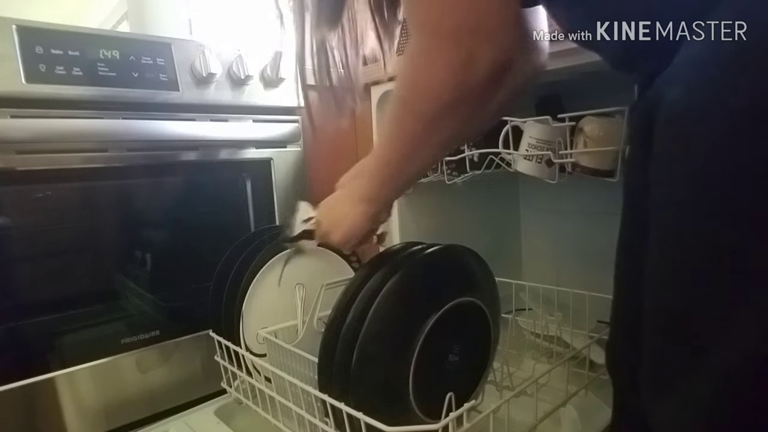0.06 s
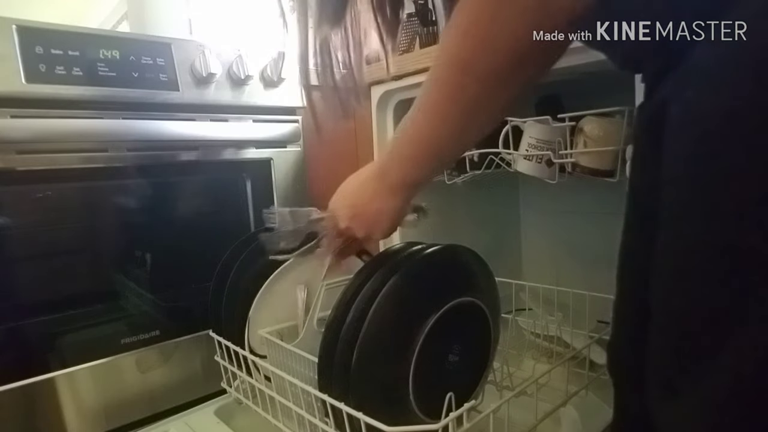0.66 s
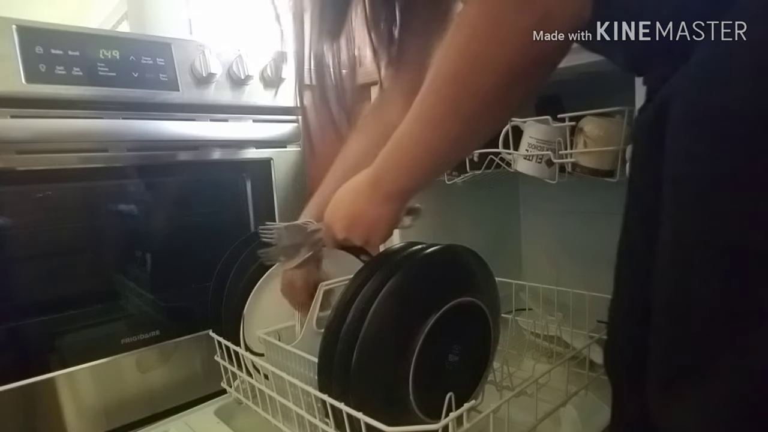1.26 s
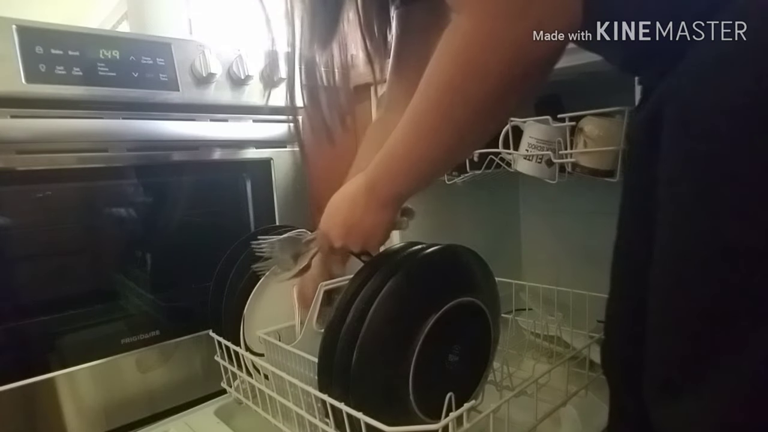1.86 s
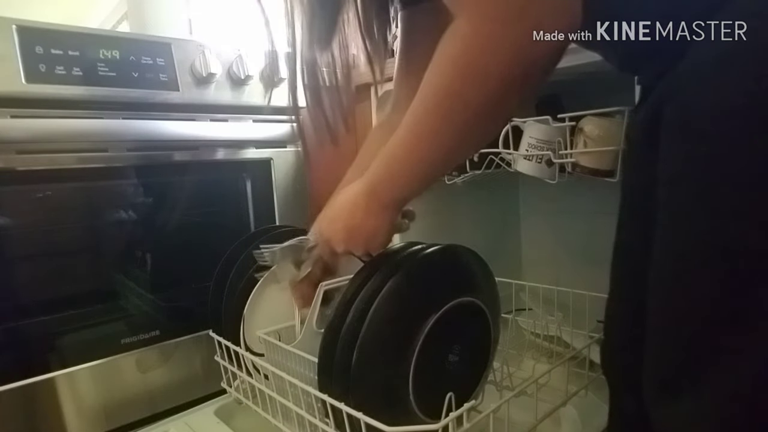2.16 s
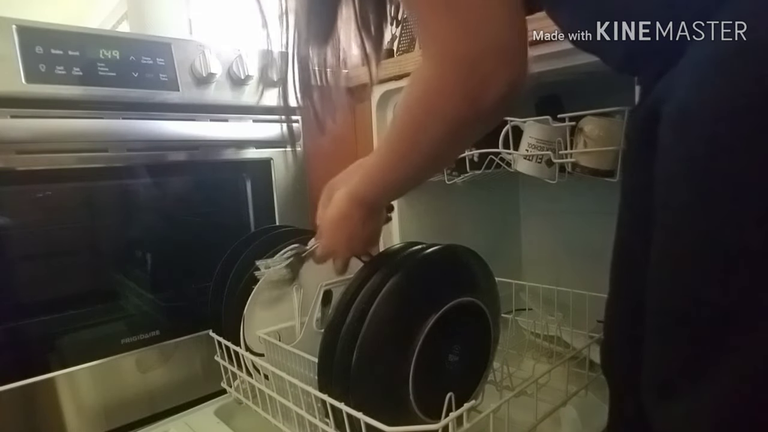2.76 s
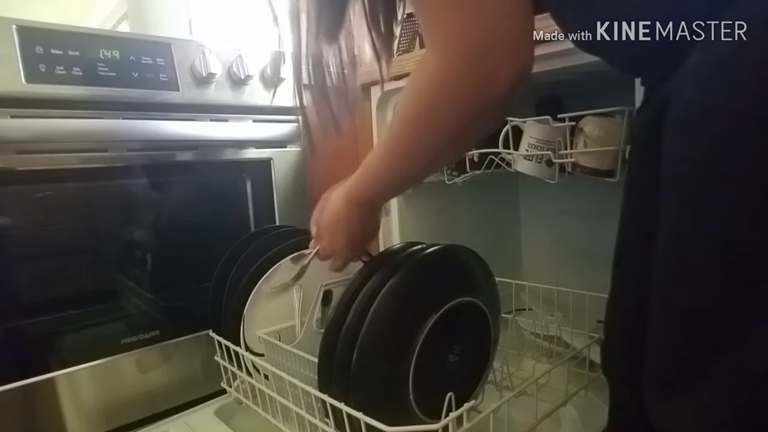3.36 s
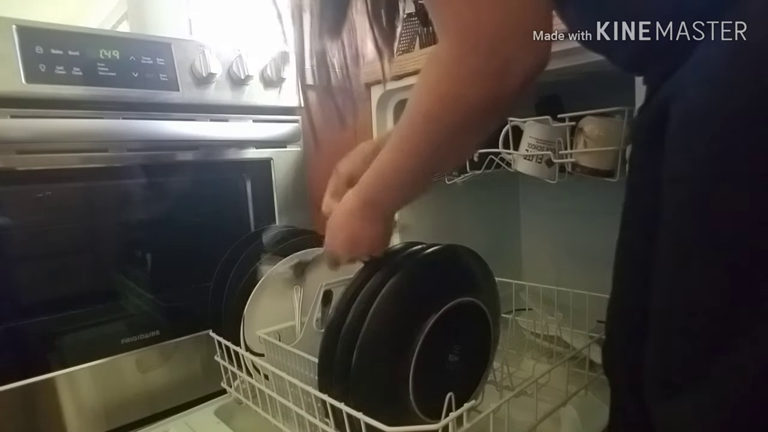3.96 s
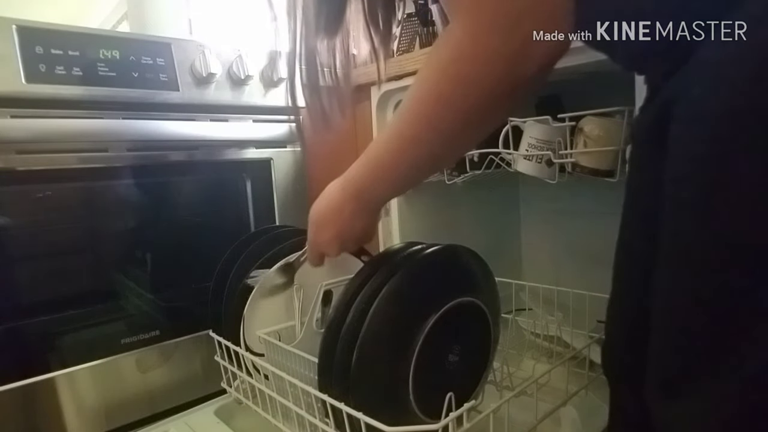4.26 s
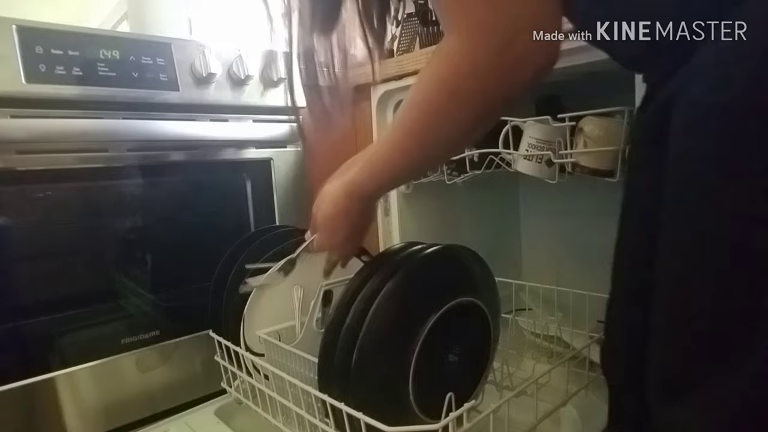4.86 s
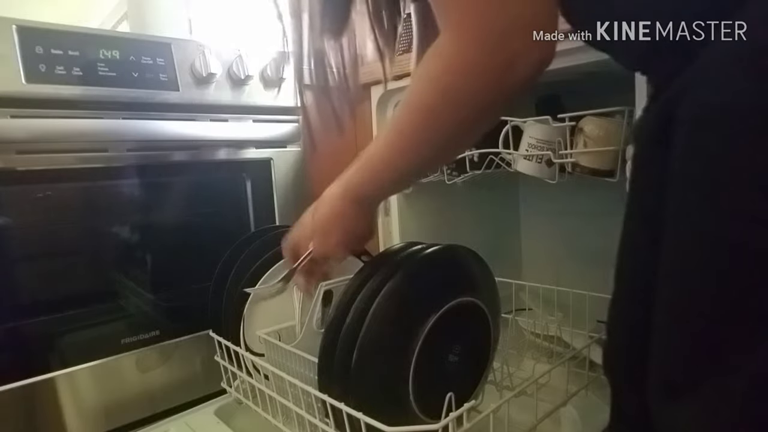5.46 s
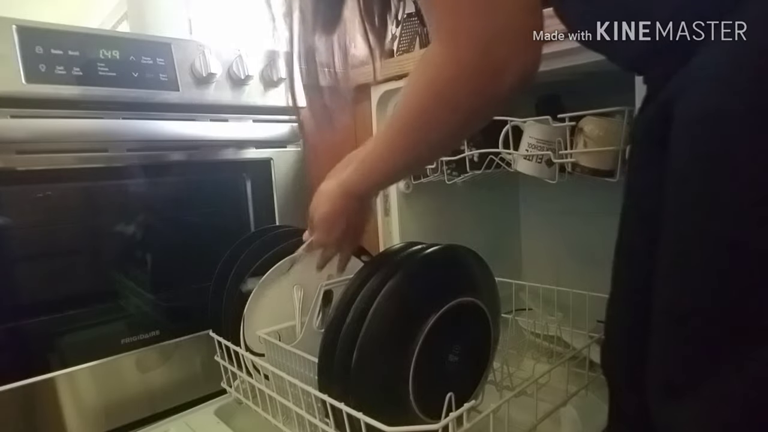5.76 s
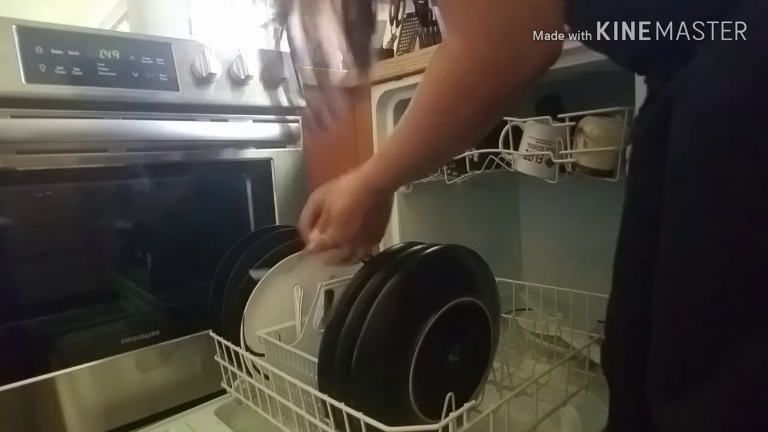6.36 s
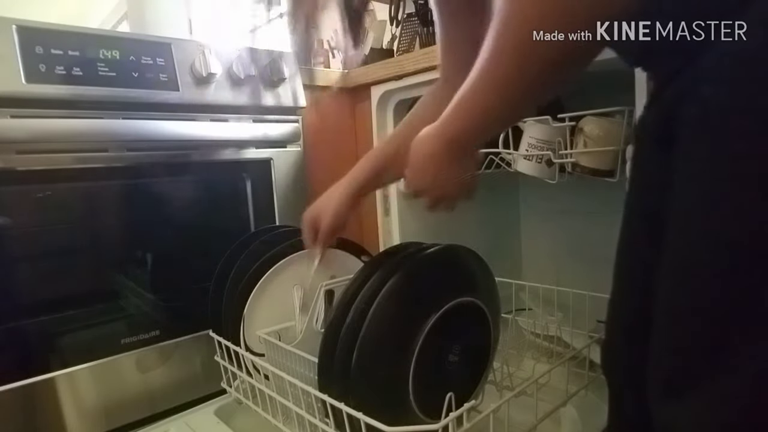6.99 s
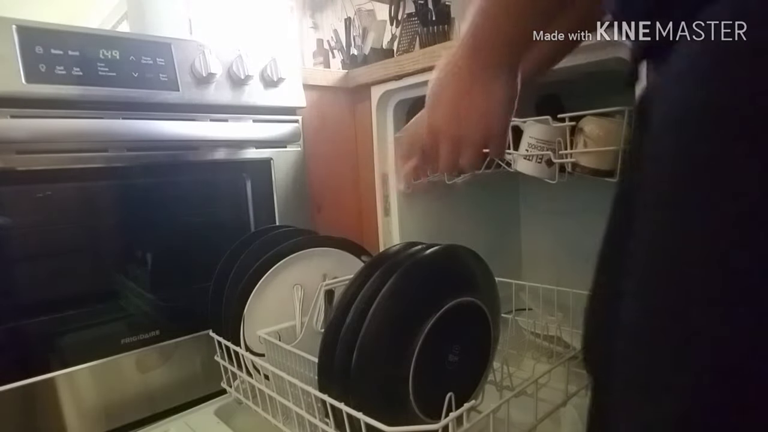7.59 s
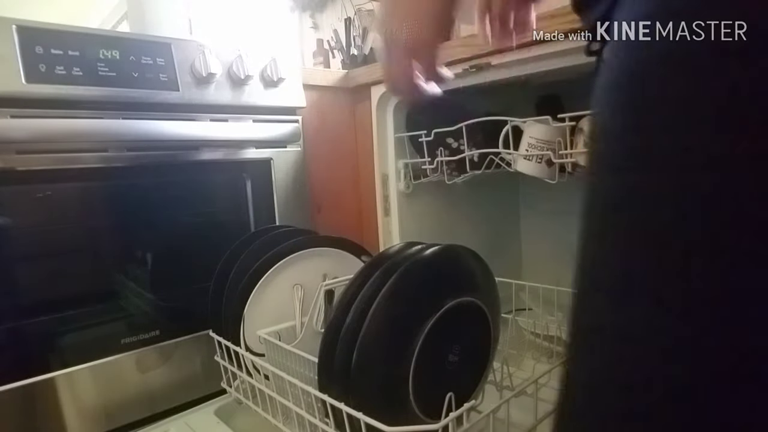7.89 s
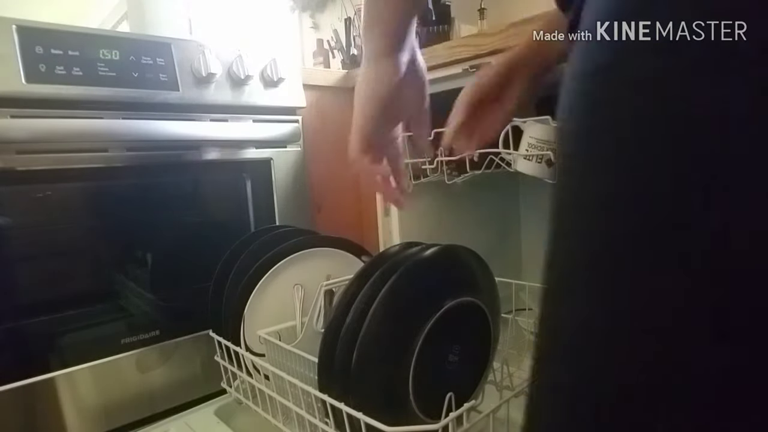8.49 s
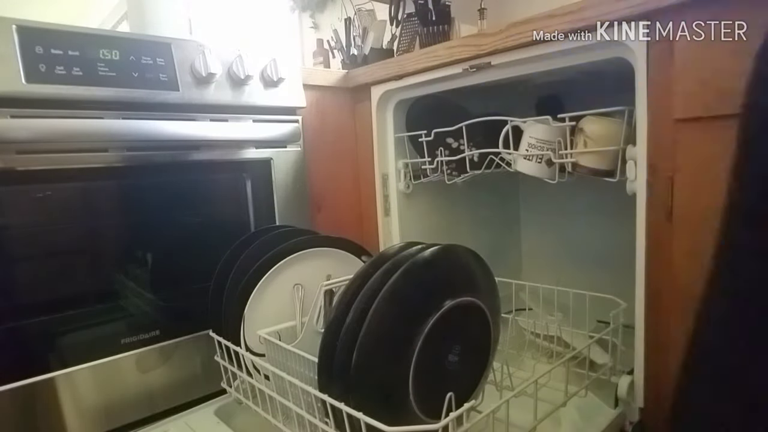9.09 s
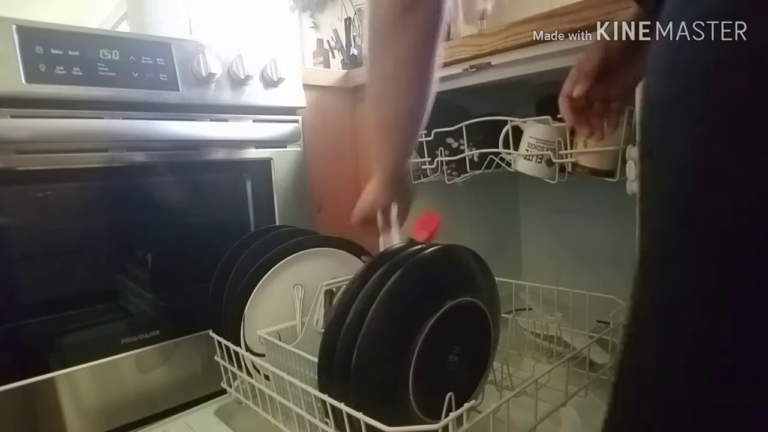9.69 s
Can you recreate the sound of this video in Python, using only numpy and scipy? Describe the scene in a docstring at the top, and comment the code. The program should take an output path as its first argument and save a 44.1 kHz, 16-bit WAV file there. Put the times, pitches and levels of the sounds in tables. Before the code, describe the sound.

Metal forks clink and clatter into a plastic dishwasher basket one by one, followed by a few dry knocks, over a faint hum.

```python
"""Forks go one by one into the plastic cutlery basket of an open dishwasher in a small kitchen.
Each touch is a rapid train of impacts that excites the modes of tines, handle, basket and wire rack.
Near the end clothes rustle and short dry knocks sound, the same parts struck over a low thud.
An appliance hums faintly over a soft hiss throughout, and hard surfaces add a short reverberation."""
import sys
import numpy as np
from scipy import signal
from scipy.fft import rfft, irfft, next_fast_len
from scipy.io import wavfile

SR = 44100
rng = np.random.default_rng(int(sys.argv[2]) if len(sys.argv) > 2 else 0)


def write(x):
    x = np.atleast_2d(x).T
    wavfile.write(sys.argv[1], SR, np.round(np.clip(x, -1, 1) * 32767).astype(np.int16))


N = 429534
RING = int(.35 * SR)  # samples given to one touch


def undb(db):
    """Amplitude ratio of a level in decibels."""
    return 10 ** (np.asarray(db) / 20)


def curve(points, hz):
    """Interpolation on a logarithmic frequency axis."""
    points = np.asarray(points)
    return np.interp(np.log(hz + 1), np.log(points[:, 0]), points[:, 1])


def freqs(size):
    """Fourier bin frequencies for that many samples."""
    return np.fft.rfftfreq(size, 1 / SR)


def response(points, size=2048):
    """Minimum-phase impulse response of a spectrum given as (Hz, dB) points."""
    cepstrum = irfft(np.log(undb(curve(points, freqs(size)))))
    cepstrum[1:size // 2] *= 2
    cepstrum[size // 2 + 1:] = 0
    return irfft(np.exp(rfft(cepstrum)))


def convolve(x, h):
    """Linear filtering of each row, keeping its length."""
    return signal.fftconvolve(np.atleast_2d(x), np.atleast_2d(h), axes=1)[:, :x.shape[-1]]


def unit(x):
    """Normalisation of each row to energy 1."""
    return x / np.sqrt(np.sum(x ** 2, axis=-1, keepdims=True) + 1e-30)


def fade(t60, size=RING):
    """Exponential decay by 60 dB in t60 seconds."""
    return np.exp(-np.log(1000) * np.arange(size) / SR / t60)


# Stereo width. Each row: frequency in Hz, side level relative to mid in dB.
STEREO_WIDTH = [(60, -12.5), (150, -16.5), (300, -12), (600, -7), (1100, -5.5), (4000, -1.5)]

def stereo(pair):
    """Mid-side mixing: two unrelated signals become left and right, coherent mainly in the bass."""
    size = next_fast_len(pair.shape[1] + 2048)
    width = undb(curve(STEREO_WIDTH, freqs(size)))
    mid, side = rfft(pair, size) / np.sqrt(1 + width ** 2)
    return irfft(np.array([mid + width * side, mid - width * side]), size)[:, :pair.shape[1]]


# Spectrum of the hiss. Each row: frequency in Hz, relative spectral density in dB.
HISS_SPECTRUM = [(15, -39), (25, -14), (86, -10.5), (122, 2.5), (144, -12.5), (331, -14.5), (368, -23),
                 (410, -18), (445, -18.5), (782, -24), (1660, -26), (5010, -34.5), (10100, -40.5),
                 (15500, -33)]

def hiss(level_db=-63):
    """Stationary filtered noise makes a soft, even background."""
    noise = convolve(rng.standard_normal((2, N)), response(HISS_SPECTRUM))
    return stereo(unit(noise) * np.sqrt(N)) * undb(level_db)


# Tones of the appliance. Each row: frequency in Hz, RMS level in dB about which it wavers.
HUM_TONES = [(112.5, -81), (61, -75)]

def appliance_hum(waver_db=1.4):
    """Low appliance hum: two faint tones that slowly waver by amplitude modulation."""
    t = np.arange(N) / SR
    waver = np.interp(t, np.linspace(0, N / SR, 40), rng.standard_normal(40))
    hum = sum(np.sqrt(2) * undb(db) * np.sin(2 * np.pi * hz * t) for hz, db in HUM_TONES)
    return hum * undb(waver_db * waver)


def chatter(length_s, first_hit=2.4, slide_s=0.016, swell=0.54, contacts_per_s=1400, scatter_db=6):
    """Contact force as a Poisson impulse train: a short touch rebounds, a long slide peaks halfway."""
    chance = np.random.default_rng(rng.integers(2 ** 31))
    gaps, sizes = chance.exponential(size=200), chance.standard_normal((2, 200))
    length_s = np.clip(length_s, .001, .1)
    at = np.cumsum(gaps) / contacts_per_s
    slide = min((length_s / slide_s) ** 2, 1)  # 0 is a pure hit, 1 a pure slide
    hump = 1 - swell * np.cos(np.pi * at / length_s) ** 2
    envelope = slide * hump + (1 - slide) * np.exp(-at / length_s)
    force = np.sign(sizes[0]) * undb(scatter_db * sizes[1]) * envelope
    train = np.zeros(RING)
    np.add.at(train, (at[at < length_s] * SR).astype(int), force[at < length_s])
    train[0] += first_hit * (1 - slide) + .5
    return train


def contact_noise(train, decay, repeat=.55):
    """Superposed noise bursts: the share `repeat` is alike at every contact, the rest is incoherent."""
    same = convolve(rng.standard_normal((2, RING)) * decay, train)
    fresh = rng.standard_normal((2, RING)) * np.sqrt(np.abs(convolve(train ** 2, decay ** 2)))
    return np.sqrt(repeat) * unit(same) + np.sqrt(1 - repeat) * unit(fresh)


def strike_point(x, hz, width, lift_db):
    """The point of excitation favours one band of the spectrum; width is a share of hz."""
    b, a = signal.iirpeak(hz, 1 / width, fs=SR)
    return x + (undb(lift_db) - 1) * signal.lfilter(b, a, x)


def struck_part(touches, levels_db, modes, spectrum, noise_t60, ring_db,
                peak_hz=None, width=.2, lift_db=8, detune=0.012, fade_speed=1):
    """Modal synthesis: each touch gives contact noise and, ring_db above it, slightly detuned modes."""
    hz, db, t60 = np.transpose(modes)
    colour, noise_fade, ring_fade = response(spectrum), fade(noise_t60), fade(t60[:, None] / fade_speed)
    tuned_phase = (2 * np.pi * hz[:, None] * np.arange(RING) / SR).astype(np.float32)
    ring_gains = undb(ring_db + np.zeros(len(touches)))
    out = np.zeros((2, N + RING))
    for k, (start_s, train) in enumerate(touches):
        weights = undb(db + 2 * rng.standard_normal((2, len(hz)))) * rng.choice([-1, 1], (2, len(hz)))
        phase = tuned_phase * (1 + detune * rng.standard_normal((len(hz), 1))).astype(np.float32)
        # a quarter cycle between mid and side lets every mode reach both microphones
        ring = np.array([weights[0] @ (np.sin(phase) * ring_fade),
                         weights[1] @ (np.cos(phase) * ring_fade)])
        crack = convolve(contact_noise(train, noise_fade), colour)
        blow = convolve(train, colour)
        sound = unit(crack) + ring_gains[k] * unit(convolve(ring, blow))
        if peak_hz is not None:
            sound = strike_point(sound, peak_hz[k], width, lift_db)
        start = int(start_s * SR)
        out[:, start:start + RING] += unit(sound) * undb(levels_db[k]) * np.sqrt(SR / 100)
    return out[:, :N]


# Normal modes. Each row: frequency in Hz, relative level in dB, t60 in seconds at a fade_speed of 1.
RACK_MODES = [(185, -1.5, 0.35), (218, 0.5, 0.06), (261, 0.5, .2), (327, 1, .16), (337, -2, 0.072),
              (456.5, 3.5, 0.28)]
BASKET_MODES = [(540, 0.5, 0.054), (628, -6.5, 0.16), (690, -3.5, 0.048), (811, -1, .05), (900, -2.5, 0.24),
                (954, 5, 0.17), (993, -3, 0.26)]
HANDLE_MODES = [(1362, 1.5, 0.063), (1614, -7, 0.059), (1999, 3.5, 0.29), (2135, 5.5, .12),
                (2325, 1, 0.033), (2710, -9, .18), (2960, 1, 0.068), (3330, -0.5, 0.13), (4550, -3, 0.14)]
TINE_MODES = [(2750, -7, .06), (3290, -4, .06), (4620, -6, .06), (5750, -6, .06), (7440, -1, .13),
              (8200, -1, .11), (9210, -3, .2), (9800, -2, .1), (10480, -2, .13), (11000, -1, .17),
              (11270, -1, .14), (11490, 0, .16), (11660, 0, .14), (12030, -2, .11), (12550, -1, .12),
              (13200, -1, .15), (13770, 0, .15), (13940, 0, .11), (14300, -1, .11), (14570, -1, .13),
              (15200, -1, .13)]
# Spectra of contact on each part. Each row: frequency in Hz, relative level in dB.
RACK_SPECTRUM = [(30, -36.5), (70, -7.5), (130, -7), (190, -1), (300, 0.5), (440, -2.5), (600, -14),
                 (1500, -63.5)]
BASKET_SPECTRUM = [(150, -41), (400, -11), (540, -6.5), (780, -1), (980, -9.5), (1200, -7), (2500, -41.5)]
HANDLE_SPECTRUM = [(500, -42.5), (1000, -10), (1350, -2), (1750, -1.5), (2200, -0.5), (3000, -2),
                   (4000, -4.5), (5200, -8), (6500, -13.5), (12000, -22)]
TINE_SPECTRUM = [(600, -55), (1600, -30.5), (2400, -14), (3300, -12), (4800, -12), (6600, -12.5),
                 (8500, -8), (10000, -4), (11700, -5), (15300, -7)]
# Forks coming to rest. Each row: start in seconds, rack level in dB, handle lift in dB,
# peak frequencies of basket, handle and tines in Hz, tine ring over contact noise in dB.
FORK_LANDINGS = [(.311, -21.5, 2, 765, 2210, 13300, -13), (0.729, -31, 2.5, 830, 2310, 13500, -8),
                 (1.313, -43, 0.5, 960, 2300, 12130, -7.5), (1.873, -54.5, -1.5, 887, 2550, 12700, 1),
                 (2.231, -36.5, -2, 700, 1800, 14500, 5), (2.628, -46.5, 0, 880, 1980, 12700, 3),
                 (3.165, -37, -0.5, 883, 3130, 14200, -0.5), (4.02, -50.5, 1.5, 900, 4000, 12100, -5),
                 (4.615, -35, -2, 860, 2090, 14000, 0), (5.492, -35.5, -1.5, 973, 1860, 14600, -2.5),
                 (6.277, -39.5, -0.5, 1000, 3120, 14670, -5.5), (7.253, -38, -2, 950, 4420, 11900, 1.5)]
# Hits and scrapes on the basket. Each row: start and length in seconds, basket and tine levels in dB.
BASKET_STRIKES = [(.279, 0.014, -30, -15), (.287, 0.035, -17, -26.5), (0.31, 0.041, -17, -22),
                  (0.361, 0.045, -22.5, -37), (0.424, 0.036, -27, -31), (0.575, 0.0051, -24, -32),
                  (0.66, 0.0098, -27, -26.5), (0.685, 0.0022, -46, -53), (0.702, 0.0056, -22.5, -32),
                  (0.726, 0.01, -40, -34), (0.782, 0.034, -34.5, -33.5), (0.852, 0.014, -33, -34.5),
                  (0.956, 0.025, -50.5, -58), (1.168, 0.0053, -44.5, -96.5), (1.316, 0.0084, -33.5, -39.5),
                  (1.334, 0.0043, -21.5, -23), (1.529, 0.0034, -40, -55), (1.69, 0.0059, -36, -55),
                  (1.873, 0.0014, -33, -21), (1.967, 0.043, -40, -61), (2.23, 0.014, -36, -36.5),
                  (2.308, 0.014, -26.5, -31), (2.355, 0.0091, -34.5, -33), (2.596, 0.0032, -35.5, -44.5),
                  (2.604, 0.0031, -27.5, -48), (2.659, 0.0078, -55, -47), (2.991, 0.0029, -50.5, -80),
                  (3.079, 0.0077, -36.5, -31.5), (3.1, 0.018, -43, -29.5), (3.156, 0.015, -47, -27),
                  (3.162, 0.01, -32.5, -30.5), (3.197, 0.047, -39, -51), (3.256, 0.0048, -36.5, -41),
                  (3.324, 0.0037, -38, -58), (3.365, 0.0013, -42.5, -31), (3.54, 0.0034, -50, -59),
                  (4.486, 0.0043, -45.5, -50.5), (4.513, 0.018, -45, -32), (4.567, 0.0067, -47, -24.5),
                  (4.582, 0.028, -37.5, -22.5), (4.612, 0.023, -35.5, -31), (5.377, 0.016, -51, -36),
                  (5.44, .028, -47, -32), (5.47, 0.022, -27, -29), (5.489, 0.0054, -52, -24),
                  (5.638, 0.0032, -41, -37), (5.685, 0.003, -44.5, -39), (6.224, 0.0073, -45.5, -45.5),
                  (6.244, 0.0046, -35, -23), (6.257, 0.044, -35.5, -18.5), (6.278, 0.036, -28.5, -16),
                  (6.429, 0.0036, -53, -35), (6.451, 0.0085, -44.5, -34), (7.237, 0.013, -46.5, -26.5),
                  (7.253, 0.022, -34.5, -17.5), (7.292, 0.018, -54, -34)]
# Forks meeting in the hand. Each row: start and length in seconds, tine level in dB, tine peak in Hz.
HAND_CLINKS = [(0.237, 0.0082, -33.5, 12200), (0.246, 0.013, -21.5, 12800), (2.203, 0.033, -35.5, 14300),
               (2.45, .0044, -29, 13600), (2.713, 0.06, -35, 9800), (2.785, 0.012, -34, 12300),
               (2.927, 0.0024, -43, 11800), (3.023, 0.0049, -41, 13100), (3.34, .005, -38, 13800),
               (3.385, .03, -42, 12330), (3.491, .004, -39, 14600), (3.602, 0.0031, -37.5, 15240),
               (3.652, .052, -37.5, 10400), (3.74, .0033, -39, 12700), (3.911, 0.0034, -46.5, 11800),
               (3.967, 0.043, -24.5, 9600), (3.994, 0.013, -18, 13000), (4.02, .035, -19.5, 12000),
               (4.135, 0.019, -31.5, 12000), (4.354, 0.025, -29.5, 11840), (4.411, 0.0025, -32.5, 11700),
               (4.862, 0.035, -35.5, 11460), (4.946, 0.005, -35, 11800), (5.137, 0.011, -40, 14300),
               (5.254, 0.0068, -48.5, 9250), (5.788, 0.0068, -24, 11360)]

def forks(basket_to_rack_db=-15, handle_share=0.25, landing_chatter_s=0.016):
    """Structure-borne sound: blows on the steel pass through the plastic basket into the wire rack."""
    landing_s, landing_db = np.transpose(FORK_LANDINGS)[:2]
    # a strike takes the tone of the fork that lands nearest in time
    strikes = [(*row, *FORK_LANDINGS[np.argmin(np.abs(landing_s - row[0]))][2:])
               for row in BASKET_STRIKES]
    # a clink barely reaches the basket, and a held handle rings high
    leak_db, leak_hz, held_handle_hz, free_ring_db = -36.5, 800, 3400, -6
    clinks = [(start, length, db + leak_db, db, 0, leak_hz, held_handle_hz, hz, free_ring_db)
              for start, length, db, hz in HAND_CLINKS]
    (start_s, length_s, basket_db, tine_db, handle_lift_db,
     basket_hz, handle_hz, tine_hz, tine_ring_db) = np.transpose(strikes + clinks)
    handle_db = basket_db + handle_share * (tine_db - basket_db) + handle_lift_db
    rack_db = np.append(landing_db, basket_db + basket_to_rack_db)
    touches = [(start, chatter(length)) for start, length in zip(start_s, length_s)]
    landings = [(start, chatter(landing_chatter_s)) for start in landing_s]
    rack = struck_part(landings + touches, rack_db, RACK_MODES, RACK_SPECTRUM,
                       noise_t60=0.15, ring_db=-7.5, detune=0.007)
    basket = struck_part(touches, basket_db, BASKET_MODES, BASKET_SPECTRUM, noise_t60=0.026,
                         ring_db=-7.5, peak_hz=basket_hz, width=.2, lift_db=6, detune=.02)
    handles = struck_part(touches, handle_db, HANDLE_MODES, HANDLE_SPECTRUM, noise_t60=0.0096,
                          ring_db=-10, peak_hz=handle_hz, width=0.31, lift_db=2, detune=.02)
    tines = struck_part(touches, tine_db, TINE_MODES, TINE_SPECTRUM, noise_t60=.022,
                        ring_db=tine_ring_db, peak_hz=tine_hz, width=0.086, lift_db=7, detune=0.016)
    return rack + basket + handles + tines


# Room decay. Each row: frequency in Hz, reverberation time in seconds, echo level in dB.
KITCHEN_DECAY = [(102, 1, 5), (260, 0.76, 2), (745, 0.39, -0.5), (1800, 0.37, 1), (4700, 0.34, 0.5),
                 (13100, 0.23, -7)]

def kitchen_echo(x, size=32768, first_reflection_s=0.0013):
    """Reverberation from hard floor and cupboards, in half-octave bands; the bass lingers longest."""
    table = np.array(KITCHEN_DECAY)
    centres_hz = 60 * 2 ** (np.arange(17) / 2)
    band = np.argmin(np.abs(np.log((freqs(size)[:, None] + 1) / centres_hz)), axis=1)
    noise, echo = rfft(rng.standard_normal((2, size))), 0
    for k, hz in enumerate(centres_hz):
        t60, level_db = curve(table[:, :2], hz), curve(table[:, ::2], hz)
        tail = unit(fade(t60, size) * (np.arange(size) > first_reflection_s * SR))
        echo = echo + irfft(noise * (band == k)) * tail * undb(level_db)
    return convolve(x, stereo(echo))


# Clothes brushing as the arms move. Each row: centre and half length in seconds, level in dB.
CLOTH_RUSTLES = [(7.773, 0.049, -58), (8.148, 0.029, -53.5), (8.188, 0.11, -62.5)]
# Spectrum of rubbing cloth. Each row: frequency in Hz, relative level in dB.
CLOTH_SPECTRUM = [(100, 2), (400, -1), (1800, -4.5), (4500, -13.5), (7000, -20), (15000, -16)]

def clothes(grain_db=4, grain_samples=100):
    """Friction noise of cloth: random grains under brief Gaussian swells."""
    t = np.arange(N) / SR
    swells = sum(undb(db) * np.exp(-((t - centre) / half) ** 2) for centre, half, db in CLOTH_RUSTLES)
    noise = rng.standard_normal((2, N))
    roughness = np.repeat(rng.standard_normal(N // grain_samples + 1), grain_samples)[:N]
    rubbing = convolve(noise * undb(grain_db * roughness), response(CLOTH_SPECTRUM))
    return stereo(unit(rubbing) * np.sqrt(N)) * swells


# Normal modes of the door. Each row: frequency in Hz, relative level in dB, t60 in seconds.
DOOR_MODES = [(86.6, -1.5, 0.094), (146.1, -6.5, 0.098)]
# Spectra of the door and the pushed basket. Each row: frequency in Hz, relative level in dB.
DOOR_SPECTRUM = [(25, -5), (55, -11), (100, 9.5), (160, 5), (260, -34), (900, -103)]
HOLLOW_SPECTRUM = [(150, -26.5), (330, 4), (450, 0.5), (750, 0), (1000, -7), (1300, -6), (2500, -55)]
# Dry bumps. Each row: start and length in seconds, thud, basket and handle levels in dB,
# basket peak in Hz.
DRY_KNOCKS = [(8.096, .002, -52, -49, -60.5, 570), (8.141, .0085, -31, -40, -50.5, 560),
              (8.162, 0.06, -38.5, -44, -58, 530), (8.326, 0.025, -82.5, -45.5, -41, 667),
              (8.356, 0.011, -57.5, -34.5, -42.5, 670), (8.38, 0.026, -42, -45, -54, 540),
              (8.4, 0.011, -45.5, -34, -34.5, 900), (8.43, 0.027, -49.5, -23.5, -38.5, 533),
              (8.689, 0.0076, -36, -64.5, -65, 538), (8.834, 0.00388, -48, -51, -57, 559),
              (8.945, 0.00325, -58.5, -58, -58, 520), (8.971, 0.0091, -43, -44.5, -60, 550),
              (9.407, 0.014, -45.5, -50, -51, 580), (9.489, .002, -80, -53, -37.5, 700),
              (9.502, 0.0064, -65, -43.5, -41.5, 900), (9.549, 0.014, -59, -33, -28.5, 1160),
              (9.589, 0.005, -53, -29.5, -38.5, 760), (9.673, .018, -63, -41, -45, 674)]
# Steel ringing out in some knocks. Each row: start and length in seconds, level in dB, peak in Hz.
STEEL_PINGS = [(8.184, 0.0041, -43, 13200), (8.402, 0.03, -31.5, 8100), (8.43, 0.019, -21.5, 9600),
               (9.548, 0.016, -30.5, 12800)]

def knocks(tine_hz=11500, handle_hz=1430, rack_offset_db=-1, handle_to_tine_db=-11.5):
    """Impact excitation: short, dry knocks on rack, basket and steel over a low thud."""
    start_s, length_s, thud_db, basket_db, handle_db, basket_hz = np.transpose(DRY_KNOCKS)
    ping_s, ping_length_s, ping_db, ping_hz = np.transpose(STEEL_PINGS)
    push = dict(first_hit=1.43, slide_s=0.0049, swell=0.25, contacts_per_s=1700)
    touches = [(start, chatter(length, **push)) for start, length in zip(start_s, length_s)]
    pings = [(start, chatter(length, **push)) for start, length in zip(ping_s, ping_length_s)]
    rack_db = (thud_db + basket_db) / 2 + rack_offset_db
    steel_db = np.append(handle_db + handle_to_tine_db, ping_db)
    steel_hz = np.append([tine_hz] * len(touches), ping_hz)
    door = struck_part(touches, thud_db, DOOR_MODES, DOOR_SPECTRUM,
                       noise_t60=0.08, ring_db=7.5, detune=0.016)
    rack = struck_part(touches, rack_db, RACK_MODES, RACK_SPECTRUM,
                       noise_t60=0.2, ring_db=8, fade_speed=7.1)
    basket = struck_part(touches, basket_db, BASKET_MODES, HOLLOW_SPECTRUM, noise_t60=0.074,
                         ring_db=-4.5, peak_hz=basket_hz, width=0.48, lift_db=17.5, fade_speed=3.1)
    handles = struck_part(touches, handle_db, HANDLE_MODES, HANDLE_SPECTRUM, noise_t60=0.077,
                          ring_db=-52, peak_hz=[handle_hz] * len(touches),
                          width=0.37, lift_db=3, fade_speed=0.8)
    tines = struck_part(touches + pings, steel_db, TINE_MODES, TINE_SPECTRUM, noise_t60=.02,
                        ring_db=-4, peak_hz=steel_hz, width=.06, lift_db=11, fade_speed=2)
    return door + rack + basket + handles + tines


# Response of the right microphone, weak in the high treble. Each row: frequency in Hz, gain in dB.
RIGHT_MIC_RESPONSE = [(200, 1.5), (700, 0), (1300, -0.5), (2500, -0.5), (3500, -3), (5000, 5.5),
                      (5600, -4.5), (6500, -7.5), (8400, -18), (9800, -10.5), (15000, -17)]

def scene(knock_echo_db=-24):
    """Superposition of direct and reverberant sound at two unequal microphones, plus hiss and hum."""
    cutlery, bumps = stereo(forks()), stereo(knocks())
    left, right = cutlery + bumps + clothes() + kitchen_echo(cutlery + undb(knock_echo_db) * bumps)
    dull_right = convolve(right, response(RIGHT_MIC_RESPONSE))[0]
    return np.array([left, dull_right]) + hiss() + appliance_hum()


def record(dry):
    """Band limiting: an elliptic low-pass filter cuts the top steeply."""
    cutoff_hz = 15700
    return signal.sosfilt(signal.ellip(10, .2, 70, cutoff_hz, fs=SR, output="sos"), dry)


dry = scene()
out = record(dry)
write(out)
```